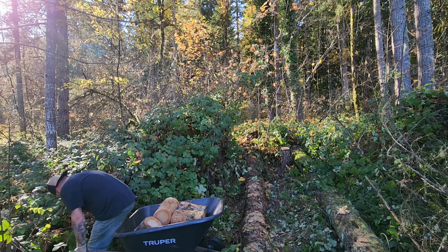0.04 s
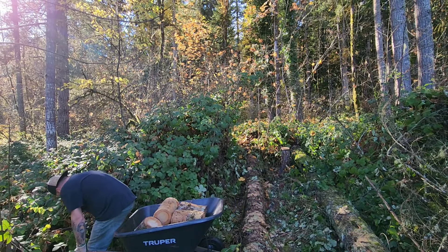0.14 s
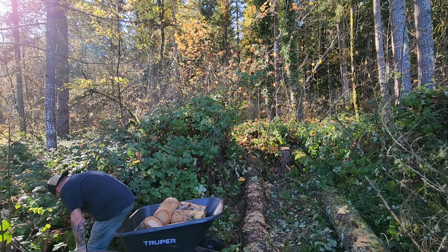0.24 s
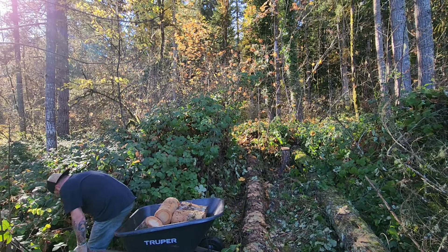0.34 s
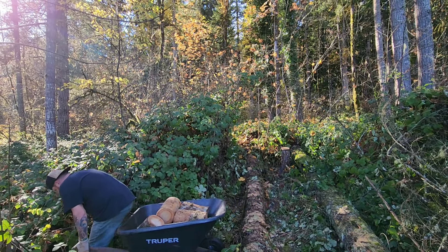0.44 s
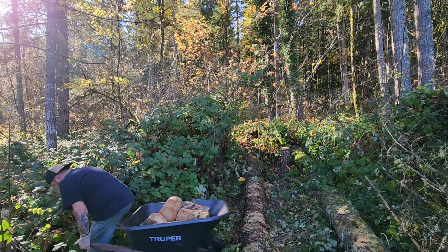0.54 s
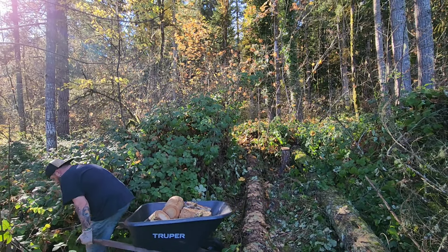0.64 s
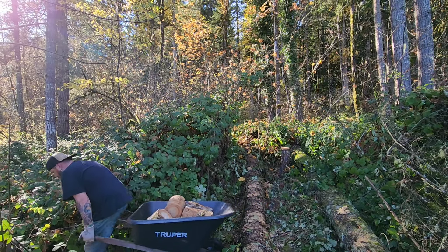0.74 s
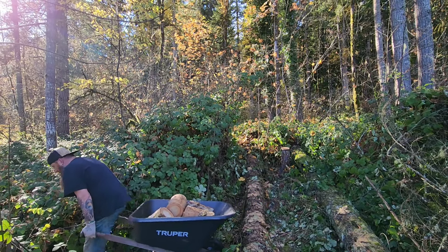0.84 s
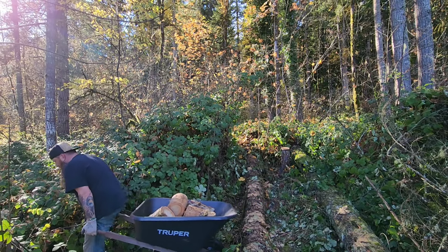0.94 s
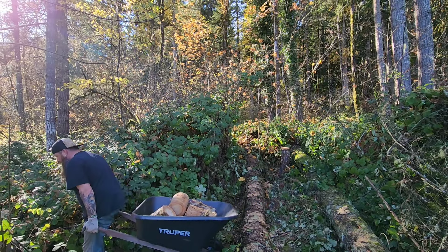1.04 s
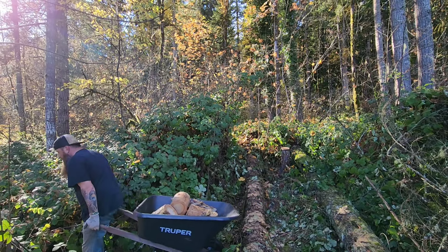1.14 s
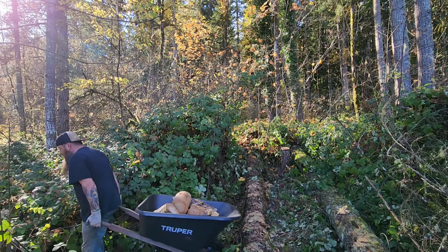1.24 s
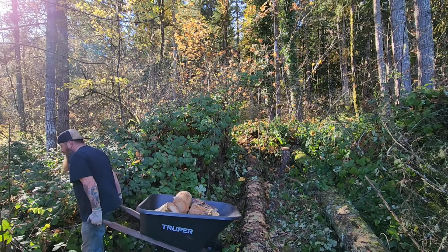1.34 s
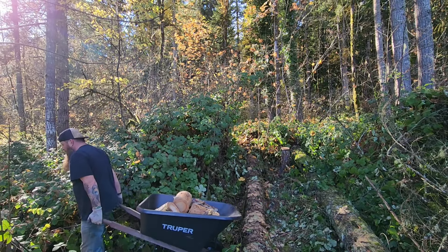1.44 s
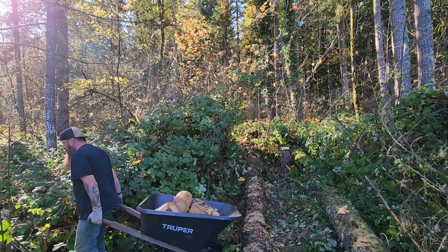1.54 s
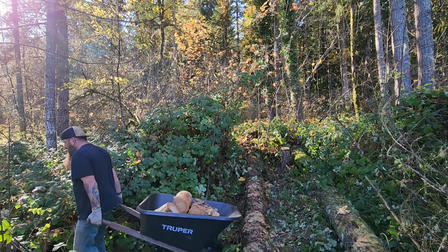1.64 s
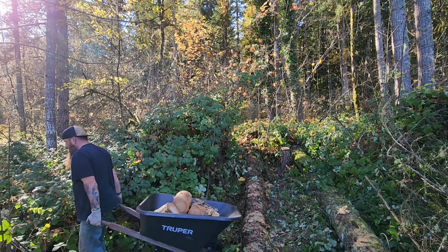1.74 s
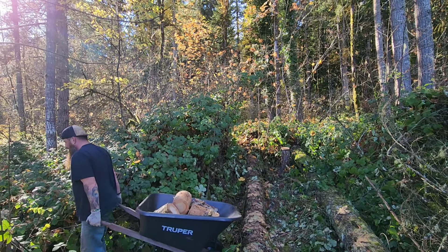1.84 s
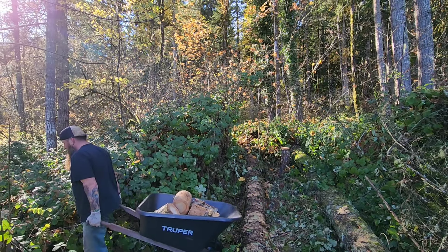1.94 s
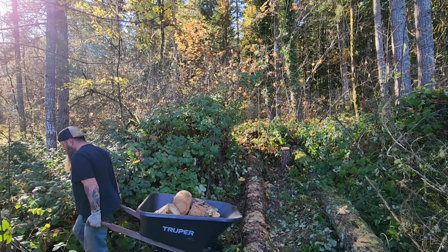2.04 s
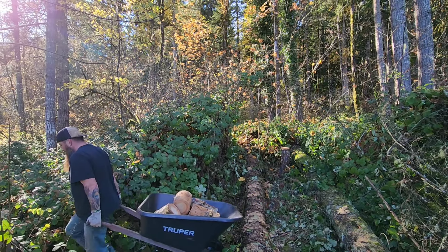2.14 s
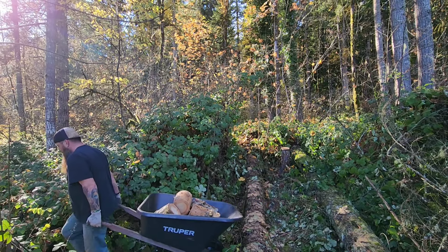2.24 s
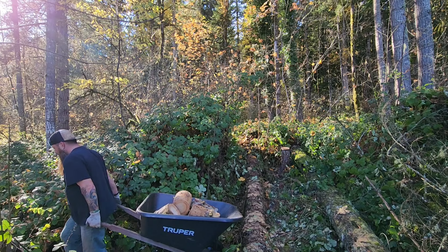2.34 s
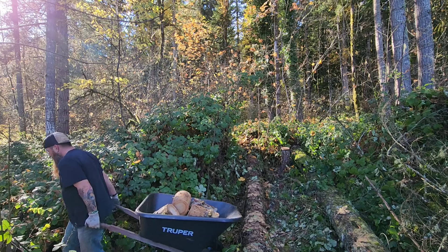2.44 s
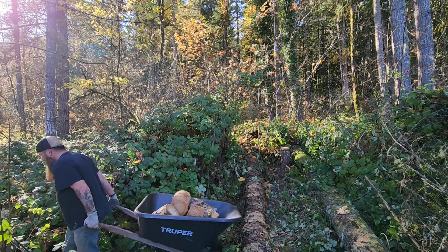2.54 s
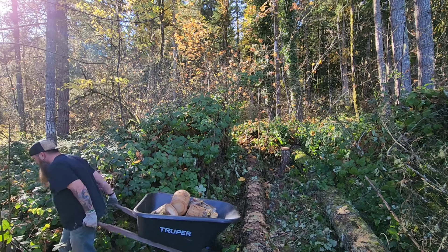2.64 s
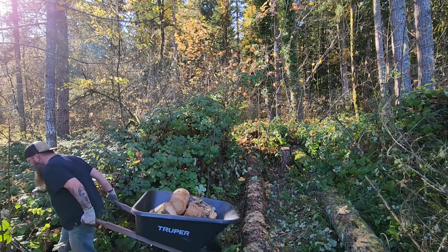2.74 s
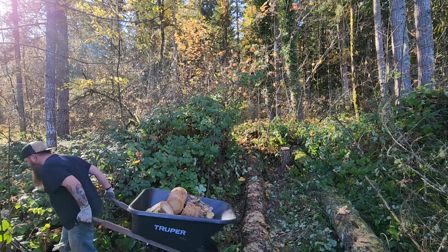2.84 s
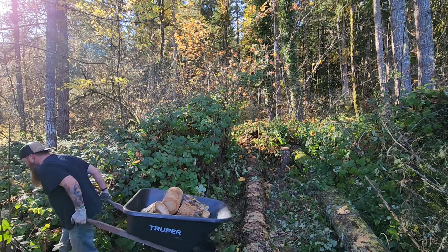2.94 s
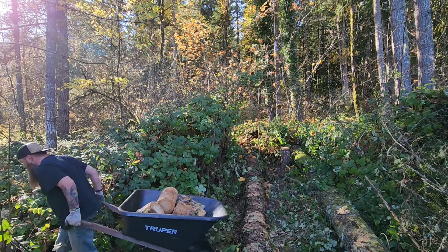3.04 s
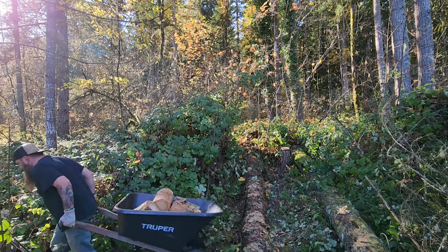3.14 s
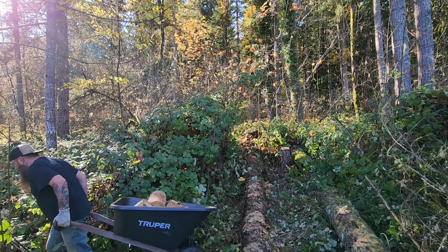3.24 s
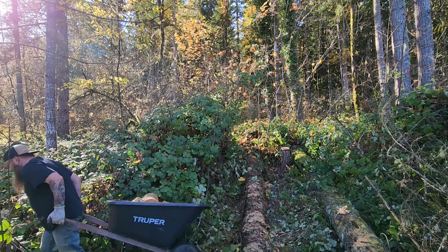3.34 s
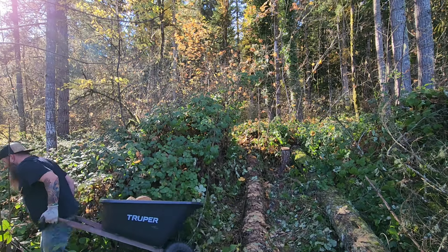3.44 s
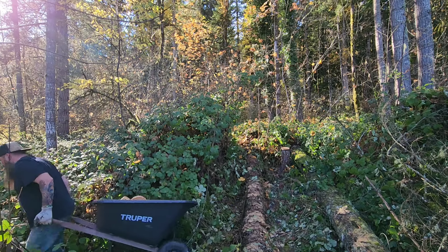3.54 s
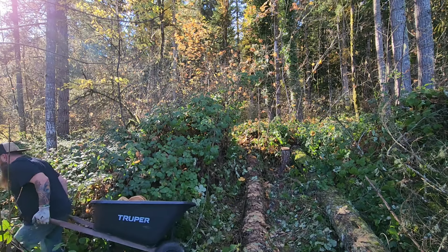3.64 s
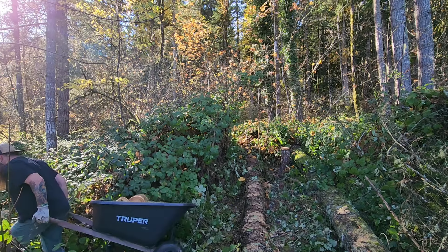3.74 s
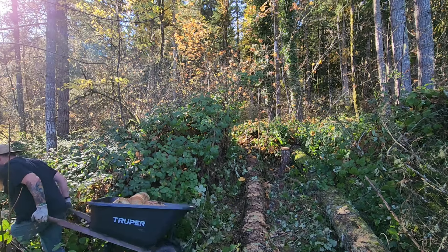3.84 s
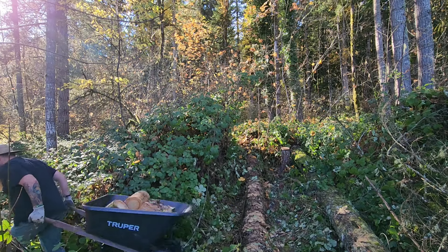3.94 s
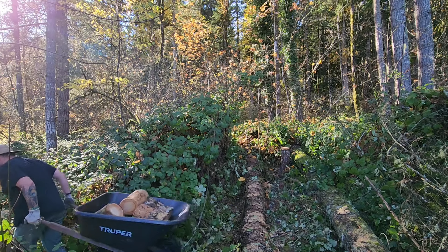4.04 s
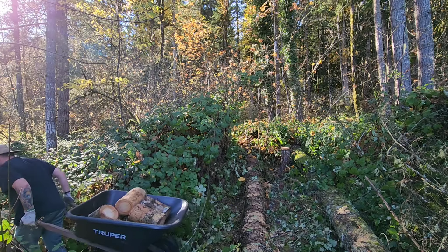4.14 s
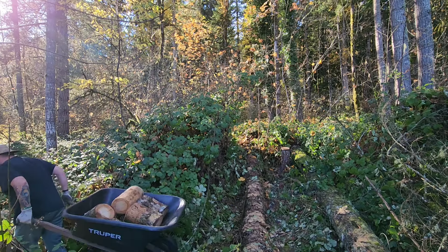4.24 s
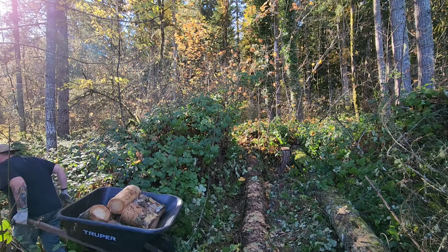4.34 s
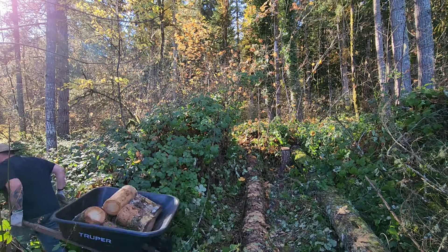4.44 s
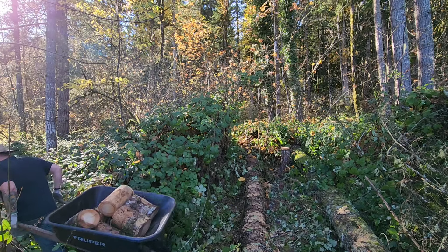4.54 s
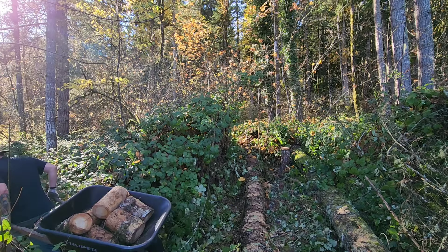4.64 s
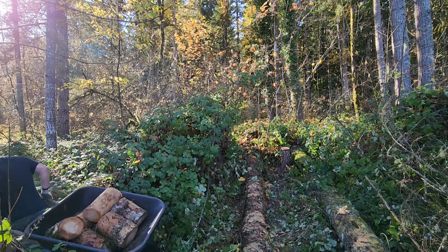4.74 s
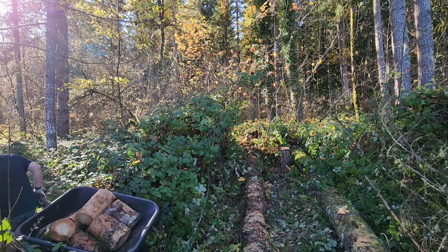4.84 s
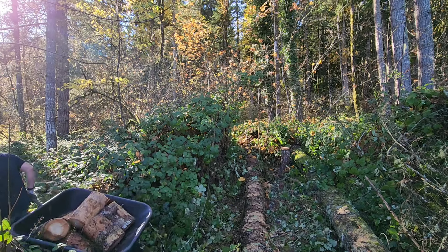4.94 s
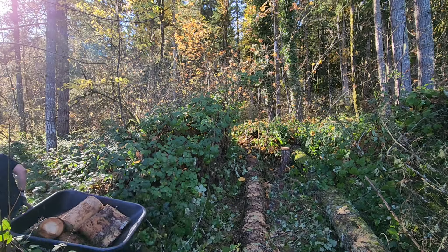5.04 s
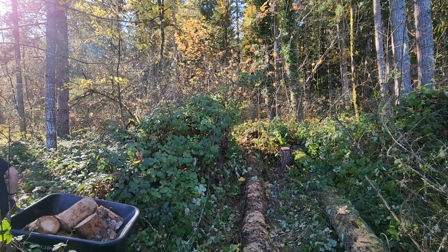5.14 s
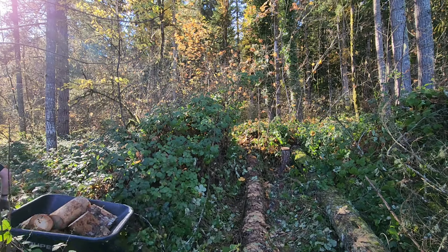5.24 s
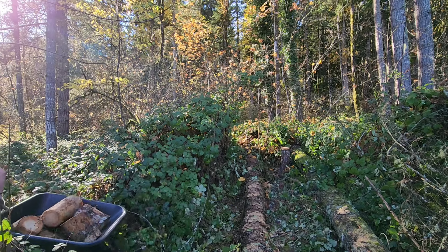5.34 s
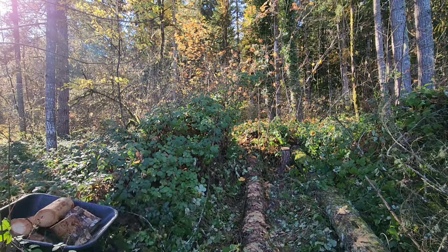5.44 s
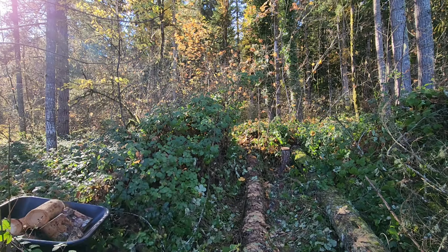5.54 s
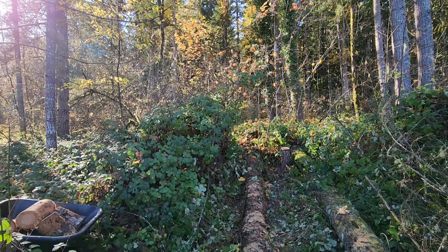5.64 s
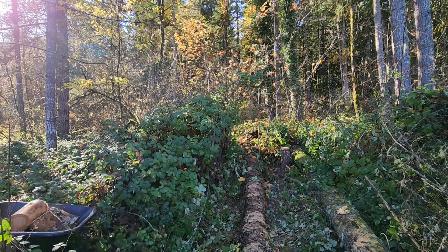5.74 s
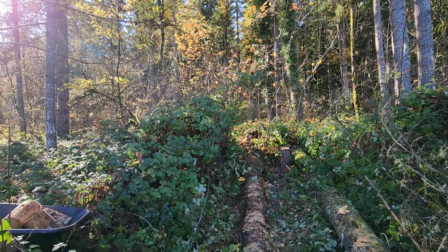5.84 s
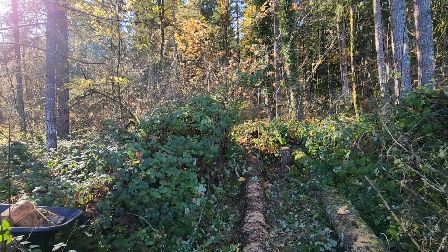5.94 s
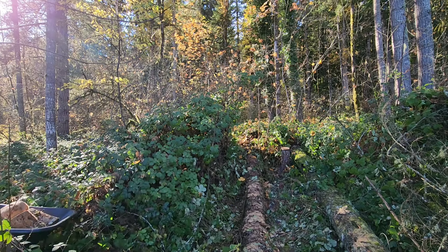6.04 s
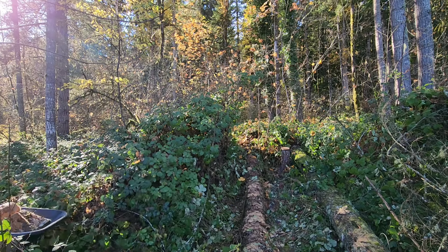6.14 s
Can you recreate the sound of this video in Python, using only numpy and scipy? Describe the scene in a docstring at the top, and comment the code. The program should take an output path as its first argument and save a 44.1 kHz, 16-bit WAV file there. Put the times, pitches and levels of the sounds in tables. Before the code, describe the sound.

Wooden rounds knock and boom in a barrow tub as boots and wheel crush dry undergrowth in a quiet forest, off to the left.

```python
"""A forest floor in still air, with a loaded wheelbarrow hauled past on the left.
Rounds of firewood thud on the tub: swept-in low blows, ringing modes and wooden clacks of noise.
The frame squeaks, creaks in runs of chirps and slips in runs of ticks; twigs snap as resonant noise bursts.
Boots and wheel crush leaves and mulch, made of coloured grains, over the low rumble of rolling.
A thin scattered tail and quiet coloured air surround it all."""
import sys
import numpy as np
from scipy import signal
from scipy.fft import rfft, irfft, next_fast_len
from scipy.io import wavfile
from scipy.ndimage import uniform_filter1d, map_coordinates

SR = 44100
rng = np.random.default_rng(int(sys.argv[2]) if len(sys.argv) > 2 else 0)


def store_wav(level_fs):
    """Save 16-bit WAV to argv[1]."""
    pcm = np.round(np.clip(np.atleast_2d(level_fs), -1, 1) * 32767)
    wavfile.write(sys.argv[1], SR, pcm.T.astype(np.int16))


N = 273414  # length in samples

# spectrum of still forest air: [pitch_hz, density_db]
AIR_SPECTRUM = [(12, -31), (25, 0.5), (55, -3.5), (90, -4.5), (180, -21), (340, -6), (560, -19),
                (1100, -27.5), (2500, -34), (7500, -36), (10000, -49), (16000, -62)]
AIR_LEVEL_DB = -66
# likeness of the two channels: [pitch_hz, likeness_0_to_1]
CHANNEL_LIKENESS = [(100, 1), (300, 0.89), (700, 0.61), (1400, 0.76), (3000, 0.42), (8000, 0.13),
                    (16000, 0)]
# the barrow's place on the left: [time_s, left_channel_lead_s]
BARROW_PATH = [(0, 0.00011), (2.5, 0.00016), (3.5, 0.000083), (4.5, 0.00012), (5.2, 0.00019),
               (6.2, 0.00026)]
# the haul, with a stall on a bump near 3.75 s: [time_s, pace_db re full walking pace, bumpiness_db]
HAUL_PACE = [(0, -43, -19), (.38, -43, -13), (0.802, -40, -2), (1.1, -26, -16.5), (1.45, -33, -21),
             (2.44, -38, -17), (2.72, -18.5, -2), (3.03, -6.5, 0.5), (3.45, -2, 2.5), (3.68, 1.5, 8),
             (3.74, -21.5, 5), (3.89, -11, -5), (4.2, -7, -4.5), (4.66, -5.5, -5.5), (4.92, -1.5, 1),
             (5.3, 2, 2.5), (5.75, -1.5, -4), (6.2, -2.5, -7.5)]
# boots treading and brushing the undergrowth:
# [start_s, hold_s under weight, leaves_level_db, mulch_level_db, soil_level_db]
BOOT_STEPS = [(.12, 0.12, -104, -74.5, -54.5), (.47, 0.066, -69, -65.5, -57), (.6, 0.17, -61, -59, -70),
              (.94, 0.015, -71, -74, -57.5), (1.13, 0.028, -75, -65, -63), (1.57, 0.12, -64, -66.5, -62),
              (1.979, 0.076, -65, -64, -66), (2.53, 0.015, -62, -64.5, -82), (2.8, 0.038, -65.5, -57, -59),
              (3.12, 0.082, -61, -57, -47), (3.46, .13, -55, -57.5, -42.5), (4.04, 0.069, -56.5, -54, -70),
              (4.51, 0.015, -61, -64, -74), (5.1, 0.081, -63, -51.5, -40.5), (5.92, 0.033, -54, -53.5, -60),
              (6.17, 0.056, -68, -49, -57)]
STEP_RISE_S, STEP_T60_S = 0.034, 0.6  # each tread swells quickly and dies away
# spectrum of rustling leaves: [pitch_hz, density_db]
LEAF_SPECTRUM = [(1000, -39), (2000, -12), (3000, -1.5), (4500, -1.5), (6200, -5), (7800, -3.5),
                 (9400, -5.5), (11000, -9.5), (15000, -8.5), (16500, -28)]
# spectrum of crushed mulch: [pitch_hz, density_db]
MULCH_SPECTRUM = [(200, -14.5), (400, 2.5), (600, 6), (850, -2), (1300, -2.5), (1900, -3.5), (2600, -5.5),
                  (4500, -43.5)]
# spectrum of the rolling tub: [pitch_hz, density_db]
ROLL_SPECTRUM = [(20, -40), (70, -19.5), (115, 1.5), (190, -2), (330, -5), (500, -25), (1000, -41.5),
                 (10000, -73)]
# spectrum of soft soil under weight: [pitch_hz, density_db]
SOIL_SPECTRUM = [(12, -18), (28, -15), (50, 7), (78, 4.5), (100, 1.5), (160, -29.5), (400, -61),
                 (10000, -79)]
# loudness of each layer: (level_db at 0 dB of pace or bumpiness, slope in dB per dB)
LEAVES_LAW, MULCH_LAW = (-55, 0.81), (-54.5, 0.59)  # follow pace
ROLL_LAW, SOIL_LAW = (-51.5, 0.94), (-55, 0.85)  # follow bumpiness
# the barrow shudders after each landing; levels re the tub ring
SHAKE_T60_S, SHAKE_TUB_DB, SHAKE_SOIL_DB = 0.3, -10.5, -17.5
# thin squeaks as the load comes up, a list of glides: [time_s, pitch_hz, level_db]
SQUEAK_GLIDES = [
    [(.96, 2290, -80), (1.04, 2330, -71.5), (1.11, 2380, -66), (1.17, 2400, -71), (1.27, 2430, -72),
     (1.36, 2440, -82)],
    [(1.16, 3250, -87), (1.19, 3550, -62), (1.24, 3680, -75), (1.31, 3720, -92)],
]
# creaks of the frame, a list of runs: [time_s, rate_per_s, level_db, pitch_hz, upward_sweep_hz]
CREAK_RUNS = [
    [(4.012, 148, -52.5, 716, 600), (4.045, 187, -52, 850, 690), (4.085, 220, -67, 1200, 1400)],
    [(4.13, 124, -53, 1130, 1690), (4.18, 124, -55, 1070, 1700), (4.27, 102, -60, 1000, 1720)],
    [(4.28, 55, -59, 2100, 200), (4.39, 53, -64, 2120, 200), (4.475, 120, -57.5, 2055, 200),
     (4.51, 86, -64, 2020, 200)],
]
# the frame slipping in runs:
# [start_s, end_s, first_gap_s, ratio of each gap to the last, level_db, pitch_hz above which modes weaken]
SLIP_RUNS = [(2.007, 2.185, .0405, 1, -53.5, 520), (2.367, 2.7, .0605, 1, -53, 500),
             (3.903, 4.052, .048, .75, -45.5, 1000), (4.2335, 4.42, .0145, 1.048, -45, 1700)]
# modes of the frame, before contact weighting: [pitch_hz, level_db, t60_s]
FRAME_MODES = [(261, 8, 0.015), (376, 1, 0.032), (570, -0.5, 0.055), (860, 1.5, 0.027), (1060, -14, 0.011),
               (1413, -1.5, 0.048), (2270, -3, 0.04), (2760, 3, 0.014)]
# twigs snapping and bark cracking:
# [start_s, level_db, treble_db before the brightness scaling, t60_s, resonance_hz]
TWIG_SNAPS = [(.583, -40, -22, 0.074, 1470), (.744, -44.5, -24.5, 0.056, 1060),
              (.846, -50, -30, .051, 1400), (.927, -44.5, -9, 0.14, 805), (.952, -45, -10, 0.043, 930),
              (1.571, -46.5, 3, 0.059, 5750), (1.591, -49, -12, .021, 1210),
              (1.665, -40.5, -12, 0.042, 845), (1.722, -56.5, 21, 0.053, 4330),
              (1.963, -40, -1, 0.099, 10000), (2.545, -44.5, -12, 0.057, 1610),
              (2.804, -48, -28, .05, 1310), (2.852, -50.5, -17, 0.096, 1700), (2.993, -52, -14, 0.05, 2670),
              (3.527, -39.5, -14, 0.035, 2300), (3.559, -27.5, -18, 0.04, 1180),
              (3.768, -45, 7, .035, 9400), (3.83, -49.5, -15, 0.043, 1420), (3.877, -54.5, 1, 0.062, 8100),
              (4.003, -52.5, 1, .04, 9200), (4.041, -52, 14, .036, 7960), (4.411, -50, -15, 0.15, 2244),
              (4.717, -28, -14.5, 0.039, 9340), (4.838, -46.5, -11, 0.11, 6060),
              (5.051, -43.5, -18.5, 0.42, 1530), (5.205, -44, -20, .15, 3660),
              (5.787, -47, -7, 0.061, 6940), (6.155, -44.5, -17.5, 0.08, 3470)]
# spectrum of a breaking twig: [pitch_hz, density_db]
TWIG_SPECTRUM = [(100, 9.5), (400, 5), (850, 8.5), (1600, 4.5), (2800, 6.5), (4000, 8), (6300, 1),
                 (8000, 5.5), (9500, 3.5), (11500, 3.5), (16000, -3)]
STRAY_TWIGS_PER_S = 5  # small twigs under the wheel
STRAY_TWIG_DB = -49.5  # loudest stray twig at full pace
# logs landing in the tub, with rings and rebound re the blow, clack re the blow before its contact trim:
# [start_s, level_db, pitch_hz, clack_db, tub_ring_db, log_ring_db, rebound_db,
#  log_pitch_hz above which log modes weaken]
LOG_THUDS = [(.452, -35.5, 169, -8.5, -8.5, -15.5, -16, 7000), (.595, -39.5, 420, -5, 3.5, -7, -3.5, 2500),
             (.662, -55.5, 400, -4, -3, -2, -6, 3000), (.763, -27, 177, -15.5, -14.5, -25, -27, 2500),
             (1.721, -49.5, 407, -4, -7, -20, -20, 2000), (1.962, -47.5, 294, -1.5, 4, 5.5, 0.5, 15000),
             (2.893, -29.5, 335, -11.5, -7.5, -12.5, -5, 2000),
             (3.146, -30.5, 178, -16.5, -6.5, -19, -3, 1800), (3.336, -37.5, 296, -8, -3, -15, 2, 2200),
             (3.403, -45.5, 348, -22, 5, -22, -7, 2000), (3.5575, -14.5, 450, -17, -10, -28, -30, 3500),
             (3.618, -23, 157, -10.5, -4, -12.5, -1, 4040), (3.641, -28, 112, -29, -15, -28, -17, 1500),
             (3.711, -32.5, 302, -43, -6, -40, -10, 1500), (3.797, -45, 346, -8, -0.5, -11, -20, 1500),
             (4.091, -27, 176, -15.5, -7.5, -22, -4.5, 2500), (4.289, -32, 230, -27, -7.5, -30, -5, 2000),
             (4.345, -35, 265, -15, -15, -25, -12, 2000), (4.48, -40.5, 290, -8.5, -4.5, -22, -8, 2000),
             (4.717, -27.5, 198, -7.5, -5, -1.5, -1, 9050), (4.756, -40, 272, -0.5, 4.5, -16, -1, 2000),
             (5.117, -34.5, 273, -18, -1, -8, -6, 2000), (5.185, -34, 103, -24, -2, -33, -8, 2000),
             (5.518, -35.5, 214, -8, 3.5, -14, -22, 2000), (5.584, -36, 96, -22, -2, -30, -6, 2000),
             (5.915, -36.5, 370, -11, -3.5, -5.5, -5.5, 1800), (5.955, -36, 282, -17, -8, -22, -15, 2000),
             (6.125, -38, 390, -4, -4, -13, -9, 2000)]
REBOUND_S = 0.013  # a log lands a second time this much later
# modes of the loaded tub, before contact weighting: [pitch_hz, level_db, t60_s]
TUB_MODES = [(56.3, -22, 0.18), (76.8, -4.5, 0.31), (112.3, -1, 0.11), (178, -11, 0.11), (189, 0, 0.13),
             (233.9, -5.5, 0.2), (238, -1, 0.12), (308.5, 3.5, 0.12), (349, 1.5, 0.091), (374, -2.5, 0.13),
             (412, 2, 0.076), (535, -1, 0.14), (578, -14, 0.3), (840, 8, 0.023), (1230, -42, .09),
             (1337, -30, 0.046), (1520, -13, 0.26)]
# modes of the dry logs, before contact weighting and damping: [pitch_hz, level_db, t60_s]
LOG_MODES = [(570, 0, .09), (840, 1, .09), (1000, 0, .07), (1190, 1, .09), (1400, -4, .07), (1600, -1, .11),
             (1910, -6, .1), (2220, -6, .09), (2470, -7, .09), (2590, -8, .09), (2940, -11, .08),
             (3540, -12, .1), (3850, -6, .08), (4090, -12, .07), (7840, -10, .08), (9300, -6, .08),
             (10490, -8, .07)]
# spectrum of a wooden clack: [pitch_hz, density_db]
CLACK_SPECTRUM = [(150, 0), (400, -7.5), (600, 14), (800, -14), (1300, 1.5), (1900, -11.5), (2800, -13),
                  (4500, -18), (9000, -34), (16000, -37)]
EDGE_HZ = 15900  # upper band limit


def amp(db):
    """Decibels to gain."""
    return 10 ** (np.asarray(db) / 20)


def unit(x):
    """Scales to rms 1."""
    return x / np.sqrt(np.mean(x ** 2) + 1e-20)


def unit_peak(x, size=220):
    """Scales the loudest 5 ms to rms 1."""
    power = uniform_filter1d(np.atleast_2d(x).mean(0) ** 2, size, mode="constant")
    return x / np.sqrt(power.max() + 1e-20)


def read(points, hz):
    """Joins (Hz, value) points on a log-frequency axis."""
    f, value = np.transpose(points)
    return np.interp(np.log(hz + 1), np.log(f + 1), value)


def add(mix, s, sound):
    """Mixes a sound in at time s."""
    part = mix[:, max(round(s * SR), 0):][:, :sound.shape[-1]]
    part += sound[..., :part.shape[1]]


def colour(x, spectrum, treble_db=0):
    """Causal filter with the given spectrum and a shelf that rises around 2-4 kHz."""
    hz = abs(np.fft.fftfreq(4096, 1 / SR))
    shelf = hz ** 3 / (hz ** 3 + 2240.0 ** 3)
    log_gain = np.log(amp(read(spectrum, hz) + treble_db * shelf))
    # minimum phase puts the energy at the onset
    taps = np.fft.ifft(np.exp(np.conj(signal.hilbert(log_gain)))).real
    return signal.fftconvolve(x, taps[None, :len(taps) // 2], axes=1)[:, :x.shape[1]]


def noise(count):
    """White noise in two channels: alike in the bass, less so in the treble."""
    size = next_fast_len(count, True)
    a, b = rfft(rng.standard_normal((2, size)))
    same = np.clip(read(CHANNEL_LIKENESS, np.fft.rfftfreq(size, 1 / SR)), 0, 1)
    right = same * a + np.sqrt(1 - same ** 2) * b
    return irfft(np.array([a, right]), size)[:, :count]


def burst(crack_s, t60, tail_db, count=8192):
    """A fracture: a very short crack of noise with a longer dying rattle."""
    t = np.arange(count) / SR
    return noise(count) * (np.exp(-t / crack_s) + amp(tail_db - 60 * t / t60))


def ring(modes, soft_hz, detune, count=12000):
    """Dying modes: the point of contact weights them, a soft contact hardly stirs the high ones."""
    t = np.arange(count) / SR
    hz, db, t60 = np.transpose(modes)[:, :, None]
    contact = rng.choice([-1, 1], hz.shape) * rng.uniform(0.66, 1.27, hz.shape)
    weight = contact / (1 + (hz / soft_hz) ** 2)
    hz = hz * (1 + detune * rng.standard_normal(hz.shape))
    partials = weight * amp(db - 60 * t / t60) * np.sin(2 * np.pi * hz * t)
    return unit_peak(partials.sum(0))


def grains(per_s, spread_db, bed_db, size=24):
    """Countless tiny fractures of uneven size over a smooth bed of friction."""
    sizes = amp(spread_db * np.minimum(rng.exponential(1, N), 4.5))
    sizes = sizes * (rng.random(N) < per_s / SR)
    power = abs(uniform_filter1d(sizes ** 2, size))
    return noise(N) * np.sqrt(power / power.mean() + amp(bed_db) ** 2)


def patchy(x, depth_db):
    """Different leaves and sticks come under load, so the colour shifts from moment to moment."""
    z = signal.stft(x, nperseg=512)[2]
    patches = rng.standard_normal(z.shape[1:])
    patches = uniform_filter1d(patches, size=7, axis=0)  # across pitch
    patches = unit(uniform_filter1d(patches, size=6, axis=1))  # across time
    return signal.istft(z * amp(depth_db * patches))[1][:, :N]


def haul(s):
    """Pace and bumpiness in dB at time s."""
    times, *controls = np.transpose(HAUL_PACE)
    return [np.interp(s, times, c) for c in controls]


def swell(s, hold_s, rise_s, t60):
    """Envelope that rises to 1 at time s, holds, and dies away."""
    t = np.arange(N) / SR - s
    rise = np.exp(-(np.minimum(t, 0) / rise_s) ** 2)
    return rise * amp(-60 * np.maximum(t - hold_s, 0) / t60)


def still_air():
    """Quiet steady noise, strongest in the bass."""
    return amp(AIR_LEVEL_DB) * unit(colour(noise(N), AIR_SPECTRUM))


def forest(x, t60=0.33, wet_db=-15):
    """Trunks and bushes scatter back a thin tail of sparse echoes."""
    t = np.arange(SR // 2) / SR
    sparse = (rng.random((2, len(t))) < .05) * (t > .008)
    taps = rng.standard_normal((2, len(t))) * sparse * amp(-60 * t / t60)
    tail_spectrum = [(100, -24), (500, -12.5), (2000, -2.0), (6000, 3.5), (15000, -6)]
    taps = colour(taps / np.linalg.norm(taps[0]), tail_spectrum)
    return amp(wet_db) * signal.fftconvolve(x, taps, axes=1)[:, :N]


def ground():
    """Wheel and boots sweep leaves, press mulch and shake the soil; bumps and landing logs make the tub rumble."""
    pace, bumps = haul(np.arange(N) / SR)
    treads = np.array([swell(s, hold, STEP_RISE_S, STEP_T60_S) for s, hold, *_ in BOOT_STEPS])
    on_leaves, on_mulch, on_soil = amp(np.array(BOOT_STEPS)[:, 2:].T) ** 2 @ treads ** 2
    shudder = sum((amp(db + ring_db) * swell(s + 0.0078, 0, 0.0072, SHAKE_T60_S)) ** 2
                  for s, db, _, _, ring_db, *_ in LOG_THUDS)

    def level(law, control, extra_power):
        """Steady rolling plus the passing pushes."""
        return np.sqrt(amp(law[0] + law[1] * control) ** 2 + extra_power)

    rumble = unit(colour(grains(90, 5.1, -0.66, size=120), ROLL_SPECTRUM))
    rumble = rumble * level(ROLL_LAW, bumps, amp(SHAKE_TUB_DB) ** 2 * shudder)
    soil = unit(colour(noise(N), SOIL_SPECTRUM))
    soil = soil * level(SOIL_LAW, bumps, on_soil + amp(SHAKE_SOIL_DB) ** 2 * shudder)
    mulch = unit(patchy(colour(grains(250, 2.27, 0.25, size=48), MULCH_SPECTRUM), 2.46))
    mulch = mulch * level(MULCH_LAW, pace, on_mulch)
    leaves = unit(patchy(colour(grains(450, 2.4, 1), LEAF_SPECTRUM), 2.64))
    leaves = leaves * level(LEAVES_LAW, pace, on_leaves)
    return rumble + soil + mulch + leaves


def squeak(flutter_hz=55):
    """Faint narrow tones whose strength and phase flutter."""
    out, t = np.zeros(N), np.arange(N) / SR
    lowpass = signal.butter(2, flutter_hz, fs=SR, output="sos")
    for glide in SQUEAK_GLIDES:
        s, hz, db = np.transpose(glide)
        flutter = signal.sosfilt(lowpass, rng.standard_normal((2, N)))
        phase = 2 * np.pi * np.cumsum(np.interp(t, s, hz)) / SR
        tone = unit(flutter[0] * np.sin(phase) + flutter[1] * np.cos(phase))
        sounding = (t > s[0]) * (t < s[-1])
        out += amp(np.interp(t, s, db)) * sounding * tone
    return out


def creaks(ring_db=-10, count=260):
    """Under a heavy strain the same joint of the frame chirps again and again."""
    out, age = np.zeros((2, N)), np.linspace(-.5, .5, count)
    for run in CREAK_RUNS:
        times, *columns = np.transpose(run)
        s, joint = times[0], ring(FRAME_MODES, 3400, 0.021, count=2000)
        while s < times[-1]:
            rate, db, hz, sweep_hz = (np.interp(s, times, c) for c in columns)
            # the joint gathers speed as it lets go, so each slip sweeps upward
            phase = 2 * np.pi * np.cumsum(hz + sweep_hz * age) / SR
            chirp = unit(np.hanning(count) * np.sin(phase))
            add(out, s, amp(db) * chirp)
            add(out, s, amp(db + ring_db) * joint)
            s += rng.uniform(.98, 1.02) / rate
    return out


def slips(uneven_db=1.0, closest_s=.01):
    """The loaded frame sticks and slips in runs of ticks, some steady, some quickening or slowing."""
    out = np.zeros((2, N))
    for s, end, gap, ratio, db, soft_hz in SLIP_RUNS:
        while s < end:
            tick_db = db + uneven_db * rng.standard_normal()
            add(out, s + 0.00109, amp(tick_db) * ring(FRAME_MODES, soft_hz, 0.057, count=2000))
            s += max(gap, closest_s)
            gap *= ratio
    return out


def stray_twigs():
    """Small twigs break at random, louder the faster the barrow goes; rows as in TWIG_SNAPS."""
    rows = []
    for when, weak, thin, short in rng.random((round(STRAY_TWIGS_PER_S * N / SR), 4)):
        s = when * N / SR
        pace_db = haul(s)[0]
        rows.append((s, STRAY_TWIG_DB + pace_db - 6 * weak, -20 + 18 * thin, .05, 1500 * 6 ** short))
    return rows


def snaps(twigs, piece_db=9, sharpness=5):
    """Dry wood breaks: thin twigs are bright, thick ones dull, each with its own resonance."""
    out = np.zeros((2, N))
    for s, db, treble_db, t60, hz in twigs:
        crack = colour(burst(.0012, t60, -3), TWIG_SPECTRUM, 1.29 * treble_db + 12.5)
        resonator = signal.iirpeak(min(hz, EDGE_HZ), sharpness, SR)
        crack = crack + amp(piece_db) * signal.lfilter(*resonator, crack)
        add(out, s + .0005, amp(db) * unit_peak(crack))
    return out


def knock(soft_hz, damping_s=0.032, count=4500):
    """A dry log rings briefly, damped by the load; each channel hears its own mixture of its modes."""
    shared = ring(LOG_MODES, soft_hz, 0.0013, count=count)
    apart = ring(LOG_MODES, soft_hz, 0.0081, count=count)
    damping = np.exp(-np.arange(count) / SR / damping_s)
    return damping * (shared + apart * np.array([[.4], [-.4]]))


def thuds(clack_db=1, rise_s=0.00434, cycles=0.73, knock_delay_s=.003, rebound_clack_db=-3, count=2048):
    """Each log pushes the tub, rings it and clacks against the load, then rebounds and lands again."""
    out, t = np.zeros((2, N)), np.arange(count) / SR
    for start, level_db, hz, wood_db, ring_db, log_db, rebound_db, soft_hz in LOG_THUDS:
        turns = (t - rise_s) * hz
        onset = np.minimum(t / 0.0006, 1)
        blow = unit_peak(np.sin(2 * np.pi * turns) * np.exp(-(turns / cycles) ** 2) * onset)
        landing = (start, level_db, clack_db)
        rebound = (start + REBOUND_S, level_db + rebound_db, rebound_clack_db)
        for s, db, contact_db in (landing, rebound):
            clack = unit_peak(colour(burst(0.0058, 0.042, 0), CLACK_SPECTRUM))
            add(out, s, amp(db) * blow)
            add(out, s + 0.00296, amp(db + ring_db) * ring(TUB_MODES, 2 * hz, 0.017, count=9000))
            add(out, s + 0.0027, amp(db + wood_db + contact_db) * clack)
        add(out, start + knock_delay_s, amp(level_db + log_db) * knock(soft_hz))
    return out


def from_left(x, side_db=2.5):
    """Sound from the left reaches that channel sooner and louder, most of all around 1 kHz."""
    size, n = next_fast_len(N, True), np.arange(N)
    shadow_points = [(60, 0.16), (400, 0.48), (1000, 0.79), (16000, 0.51)]
    shadow = amp(side_db * read(shadow_points, np.fft.rfftfreq(size, 1 / SR)))
    left, right = irfft(rfft(x, size) * np.array([shadow, 1 / shadow]), size)[:, :N]
    lead_s = np.interp(n / SR, *np.transpose(BARROW_PATH))
    return np.array([left, map_coordinates(right, [n - SR * lead_s], order=3)])


def scene():
    """The barrow in still forest air."""
    frame = squeak() + creaks() + slips()
    twigs = snaps(TWIG_SNAPS) + snaps(stray_twigs())
    barrow = from_left(ground() + frame + twigs + thuds())
    return still_air() + forest(barrow) + barrow


def record(dry):
    """Limits the band with a steep linear-phase lowpass."""
    lowpass = signal.firwin(401, EDGE_HZ, window=("kaiser", 9), fs=SR)
    return signal.oaconvolve(dry, lowpass[None], "same")


dry = scene()
out = record(dry)
store_wav(out)
```